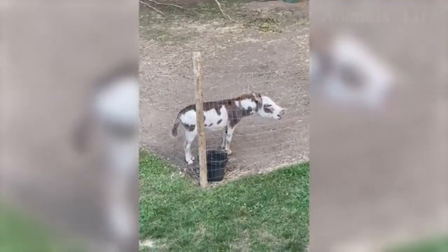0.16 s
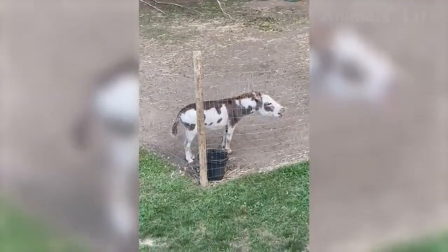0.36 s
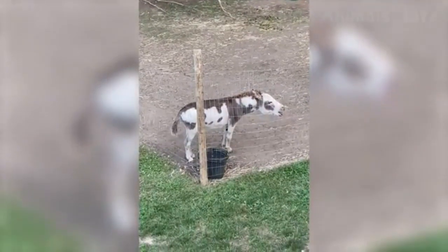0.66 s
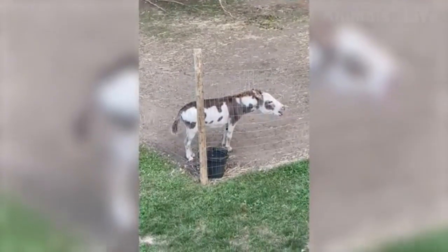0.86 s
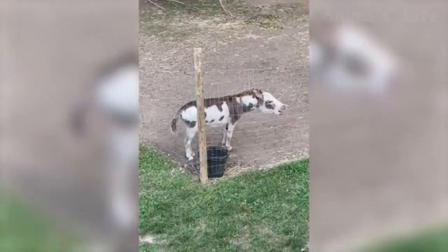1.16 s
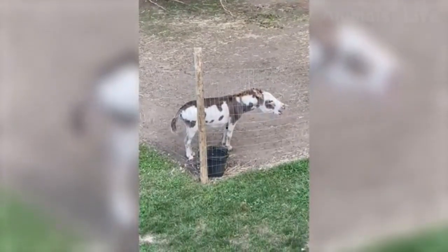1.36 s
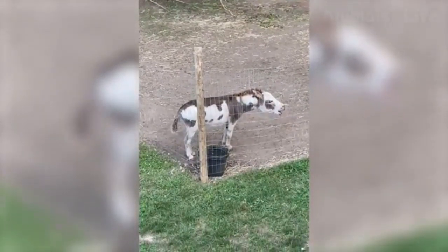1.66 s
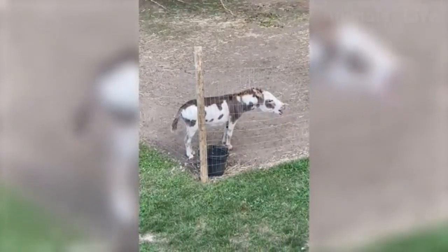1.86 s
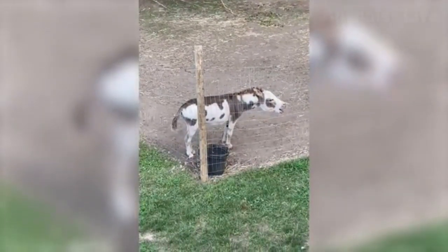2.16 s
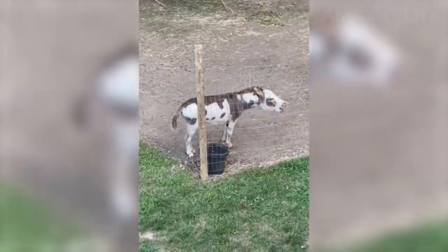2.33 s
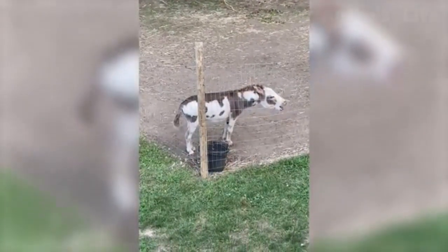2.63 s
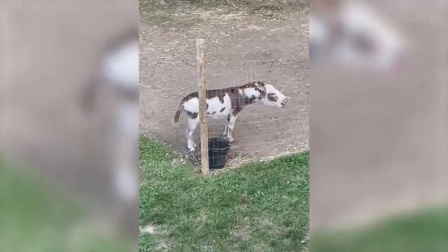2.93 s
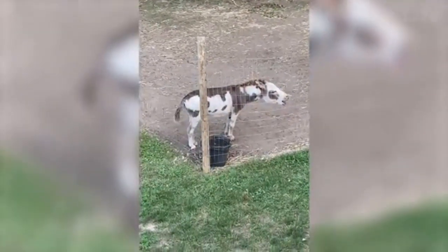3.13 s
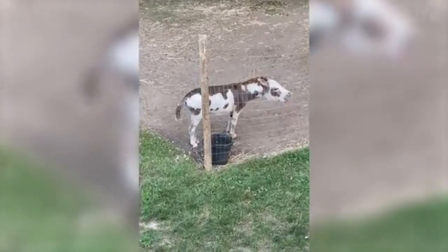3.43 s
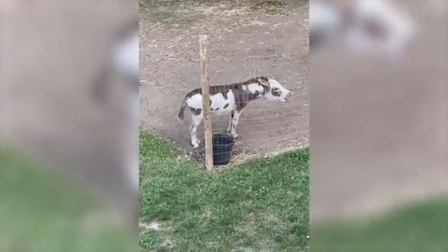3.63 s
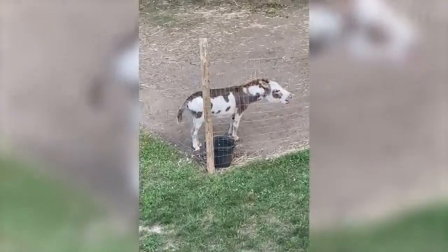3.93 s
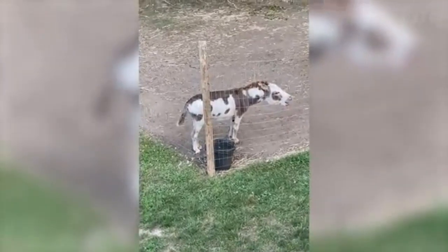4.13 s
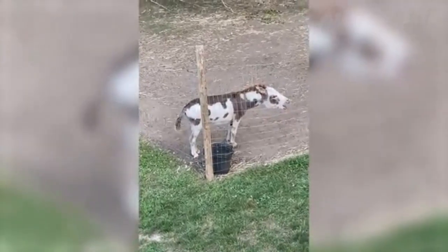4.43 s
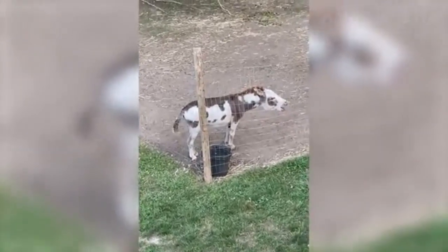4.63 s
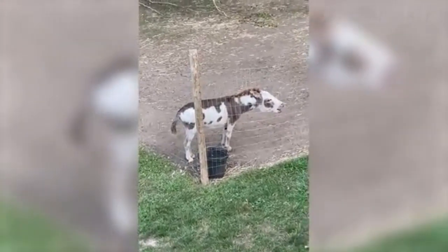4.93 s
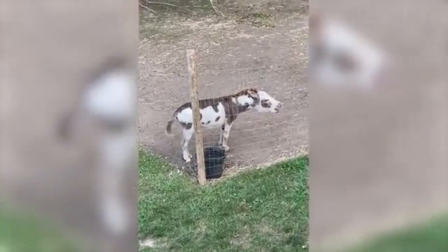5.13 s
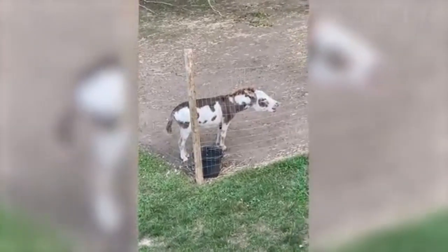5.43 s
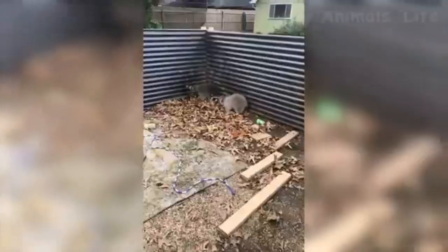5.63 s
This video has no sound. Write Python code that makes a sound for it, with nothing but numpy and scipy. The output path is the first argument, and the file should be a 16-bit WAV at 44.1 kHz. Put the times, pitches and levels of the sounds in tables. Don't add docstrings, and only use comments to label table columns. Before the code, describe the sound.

A donkey brays in a farmyard, some metres from the microphone. It starts immediately with a hoarse, strained out-breath, loudest near 0.3 s, which clears by 0.4 s into a held, slightly wavering note that weakens, flicks upward and dies roughly at 1.05 s. From 1.2 s the bray becomes a pumping run: very short, thin high whistles on the in-breath, often dropping in pitch, alternate with harsh quarter-second haws at about 1.5, 1.9, 2.5, 2.9, 3.5, 4.1, 4.7 and 5.3 s. The haws at 1.9 and 2.9 come without a whistle before them and sound less rough. Each haw swells from tone into buzzing rasp. A wall echoes about an eighth of a second later, with a light diffuse tail. Low wind, airy hiss and a faint far motor hum lie beneath. At 5.53 s everything cuts to brief silence, then from 5.57 s dry leaves rustle and crackle quietly.

```python
import sys
import numpy as np
from scipy import signal
from scipy.fft import rfft, irfft, next_fast_len
from scipy.io import wavfile
from scipy.ndimage import uniform_filter1d

SR = 44100
rng = np.random.default_rng(int(sys.argv[2]) if len(sys.argv) > 2 else 0)


def convert_level_to_amplitude(level_db):
    exponent = np.asarray(level_db, float) / 20
    return 10 ** exponent


def unload_wav(signal):
    wavfile.write(
        sys.argv[1],
        SR,
        np.round(np.clip(np.atleast_2d(signal).T, -1, 1) * 32767).astype(np.int16),
    )


N = 255162
TIME = np.arange(N) / SR
SILENCE_S = 5.531

# start t/s, length t/s, effort level/dB, half fold rate f/Hz, harshness level/dB
HAWS = [
    (1.466, 0.27, -20.5, 588.4, -3),
    (1.897, 0.2, -18, 597.9, -7),
    (2.505, 0.26, -20.5, 590.4, -3.5),
    (2.9, 0.24, -19.5, 596.2, -7),
    (3.522, 0.24, -19.5, 589.1, -2),
    (4.118, .25, -20.5, 585.6, -3),
    (4.703, .24, -20.5, 577.5, -4.5),
    (5.292, 0.24, -20, 577, -2),
]
# start t/s, upper note t/s, whole length t/s, upper level/dB, lower level/dB
HEES = [
    (1.163, 0.077, .19, -22, -26),
    (2.236, 0.082, 0.17, -20, -36),
    (3.252, .078, 0.18, -22, -26.5),
    (3.919, 0.089, 0.11, -24, -49),
    (4.516, .058, .11, -26, -29.5),
    (5.108, .052, 0.11, -25, -32),
]
# t/s, half fold rate f/Hz, effort level/dB,
# octave line over fold line level/dB, harshness level/dB
HOARSE_START = [
    (.02, 520.2, -29.5, -5, -5),
    (.045, 538.8, -24, 8, -1),
    (.19, 631.4, -25, -6.5, -3),
    (.24, 591.2, -18, -1, -8),
    (0.289, 588, -17, -7.5, -11),
    (.355, 575.7, -22.5, 6, -12),
]
HELD_NOTE = [
    (.39, 565.7, -25.5, -2.5, -24.5),
    (.57, 558.6, -28.5, 2.5, -36),
    (.7, 569.7, -30, 2, -28.5),
    (.83, 561.3, -31.5, -1.5, -46),
    (.87, 569.2, -26.5, 2, -36),
    (.954, 580.3, -31.5, 12.5, -15),
    (.99, 593.4, -23.5, -4, -34),
    (1.01, 574, -33, -1, -9.5),
    (1.065, 581.3, -34, -18, -28),
]
# fold line level/dB, octave over fold level/dB, half over fold level/dB
HAW_STAGES = [
    (-24.5, 0, -27),
    (-5.5, 0, -26),
    (-5, 0, -22),
    (-4, 1.5, 1),
    (0.5, -1.5, 2.5),
    (0, -1, -4.5),
    (-2, -14, -10.5),
    (-8, 9.5, 5.5),
    (1, -3.5, -10),
    (-14, -8.5, -26),
]
STAGE_RASP_DB = [-26, -15, -12, -9, -6, -2, 0, -6, -15, -22]
RATE_SCOOP = [1, .9, .8, .6, .4, .1]
# multiple of the half rate [1], level/dB under the octave line if even, the half line if odd
OVERTONES = [(3, -1.5), (5, -4.5), (6, -14), (7, -18.5), (8, -23), (9, -36), (10, -28.5), (11, -20)]
# multiple [1], level/dB
SECOND_LINES = [(1, -7), (2, 0), (3, -4), (4, -10), (5, -18)]
# f/Hz, width f/Hz, level/dB
THROAT_MODES = [(496.6, 110, -1.5), (641, 597, -19.5), (1225, 140, 2.5), (1281, 220, -2), (1590, 160, -1),
                (1719, 34, -19.5), (2082, 130, -2.5), (2352, 270, -9), (2564, 177, -4.5), (2878, 345, -8.5),
                (3170, 550, -15), (4037, 530, -22.5), (4720, 240, -32), (5240, 290, -30.5)]
# delay t/s, level/dB
NEAR_ECHOES = [(.024, -13.5), (0.028, -23), (.048, -28), (0.058, -24), (0.087, -19.5)]
# f/Hz, level/dB
YARD_COLOUR = [(400, -6), (1200, 1.5), (2400, -3), (4000, 5), (6000, 1)]
# delay t/s, level/dB
WALL_ECHOES = [(.118, -12), (.1235, 0), (.247, -26)]
# f/Hz, level/dB
WALL_COLOUR = [(400, -22), (600, -20), (1200, -18), (2400, -17), (4000, -15), (5400, -10), (6000, -7.5)]
# t/s, level/dB
LEAVES = [
    (5.572, -36),
    (5.58, -32.5),
    (5.6, -38.5),
    (5.72, -40),
    (5.765, -33),
    (5.786, -34),
]
# f/Hz, level/dB per Hz
LEAF_COLOUR = [(180, -10), (300, -13.5), (518, -12.5), (553, -20), (726, -8), (1140, -9), (2000, -8),
               (6700, -12), (8710, -38), (14700, -120)]
# f/Hz, level/dB per Hz
BACKGROUND_COLOUR = [(53, -34), (90, -8), (337, -11.5), (565, -10), (949, -16), (1150, -8), (1870, -10.5),
                     (2270, -5), (3680, -24.5), (3950, -12), (4900, -31.5), (5550, -8), (6400, -23), (8320, -39),
                     (14100, -120)]
# t/s, level/dB
GUSTS = [(0, -37), (.48, -54), (1.1, -68), (1.6, -57), (1.99, -47.5), (2.301, -57), (2.62, -58),
         (3.06, -60), (3.7, -60.5), (4.45, -55), (5.3, -61)]
# f/Hz, level/dB
MOTOR_LINES = [(106, -59), (212, -63.5)]
# f/Hz, level/dB
TREBLE_COLOUR = [(6400, -52), (6500, -25), (7700, -26.5), (8400, -29.5), (8900, -35.5), (9500, -23.5),
                 (10100, -11.5), (11000, -14), (11900, -26.5), (12100, -46)]
# delay t/s, level/dB
WIDTH_TAPS = [(.0099, -2.5), (0.014, -13), (0.021, -2.5), (0.024, -31), (0.03, 10)]
# f/Hz, level/dB
WIDTH_COLOUR = [(60, -40), (250, -37), (500, -25), (900, -26), (1100, -13), (1300, -14), (1500, -28),
                (3500, -31), (5000, -30), (6400, -29), (6700, -9), (8500, -8), (11000, -24)]
# f/Hz, level/dB against the whole moment
WEAK_BANDS = [(1500, -75), (3000, -49), (4000, -49), (6000, -65.5), (9000, -65), (13000, -58.5)]


def haws():
    gate, (half_hz, fold_db, octave_db, half_db, rasp_db) = breaths(out_breaths(), fade_s=0.0038)
    chaos = np.clip(convert_level_to_amplitude(rasp_db - fold_db + 3), 0, 1)
    jitter = 0.00078 * drift(20) + 0.0304 * chaos ** 2 * drift(62.4)
    phase = turning(half_hz * (1 + jitter))
    lines = convert_level_to_amplitude(fold_db) * np.sin(2 * phase)
    lines += convert_level_to_amplitude(octave_db) * np.sin(4 * phase + 1)
    lines += convert_level_to_amplitude(half_db) * np.sin(phase)
    for k, db in OVERTONES:
        parent_db = half_db if round(k) % 2 else octave_db
        lines += convert_level_to_amplitude(parent_db + db - k * chaos + 2.2 * drift(6.3)) * np.sin(round(k) * phase + k * k)
    thirds = sum(convert_level_to_amplitude(3 * drift(20)) * np.sin(k * phase * 2 / 3 + k) for k in (2, 4, 5, 7, 8, 10))
    three_beat = convert_level_to_amplitude(-46) * swell(0.88, 1, 0.024) * thirds
    voiced = np.sqrt(2) * (convert_level_to_amplitude(-5 * chaos) * lines + three_beat)
    beats = np.diff(np.floor(phase / np.pi + 0.12 * drift(300)), prepend=0) > 0
    shares = (1 / 2, 2 / 3, 1 / 3, 1 / 5)
    patterns = sum(convert_level_to_amplitude(5 * drift(14)) * np.cos(phase * share + 1.2 * drift(25)) for share in shares)
    slaps = beats * (1.5 * rng.uniform(-1, 1, N) + 0.45 * patterns)
    rasp = convert_level_to_amplitude(rasp_db + 7.5) * throat(slaps + 0.058 * noise())
    return gate * (voiced + rasp)


def out_breaths():
    half_line_db = -4
    calls = [[(s, hz, db, db + bright, db + harsh + half_line_db, db + harsh)
              for s, hz, db, bright, harsh in HOARSE_START + HELD_NOTE]]
    catch_s, release_s, repeat_dip_hz = 0.011, 0.04, 21.99
    harsh_lift_hz = 18
    fold, bright, half = np.transpose(HAW_STAGES)
    for start, length, db, hz, harsh in HAWS:
        full, slack_hz, since, until, uneven = habit(start)
        stages_s = [0, catch_s, uneven - 0.007, uneven, full, since * length, (since + until) / 2 * length,
                    until * length, length - release_s, length]
        s = start + np.maximum.accumulate(stages_s)
        rate = hz + np.r_[-slack_hz * np.array(RATE_SCOOP), harsh_lift_hz, -harsh_lift_hz / 2, 0, 0]
        if slack_hz < 0:
            rate[1:6] = hz - repeat_dip_hz * np.array([1, 0.4, 0.2, 0, 0])
        rasp = db + harsh + np.array(STAGE_RASP_DB)
        calls.append(np.transpose([s, rate, db + fold, db + fold + bright, db + fold + half, rasp]))
    return calls


def habit(start_s):
    if any(0 < start_s - hee[0] < 0.4 for hee in HEES):
        return 0.04, 40, 0.3, 0.7, 0.02
    return 0.055, -25, 0.45, 0.75, 0.042


def second_beat():
    spells = [(0.013, 0.22, -20)]
    for start, length, db, _, _ in HAWS:
        _, _, since, until, _ = habit(start)
        spells.append((start + since * length - 0.02, start + until * length, db - 8))
    gain = sum(convert_level_to_amplitude(db) * swell(a, b, 0.028) for a, b, db in spells) * convert_level_to_amplitude(3.3 * drift(18))
    octave_hz = 1281
    phase = turning(octave_hz * (1 + 0.025 * drift(9) + 0.0109 * drift(52))) / 2
    return gain * sum(convert_level_to_amplitude(db + 2.74 * drift(26)) * np.sin(round(k) * phase + k * k) for k, db in SECOND_LINES)


def throat(x):
    modes = 0
    for k, (hz, width_hz, db) in enumerate(THROAT_MODES):
        modes = modes + (-1) ** k * convert_level_to_amplitude(db) * twice_resonant(x, hz, width_hz)
    return rms_one(colour(modes, [(300, -10.5), (390, 0.5), (760, 1), (950, 0), (1090, 0.5)]))


def hees():
    gate, (hz, whistle_db, hiss_db, air_db) = in_breaths()
    phase = turning(hz * (1 + 0.00389 * drift(121)))
    whistle = np.sqrt(2) * convert_level_to_amplitude(np.minimum(whistle_db, -17) + 1.5 * drift(70)) * np.sin(phase)
    hiss = convert_level_to_amplitude(np.minimum(hiss_db, -33)) * rms_one(twice_resonant(noise(), 5750, 900))
    hiss_from_hz = 5130
    hiss = colour(hiss, [(hiss_from_hz * 0.91, -22), (hiss_from_hz, 0), (6450, 0.5), (6700, -15)])
    edge = colour(resonance(noise(), 1950, 1500), [(4200, 0.5), (4700, -18)])
    edge = convert_level_to_amplitude(air_db - 1.5) * rms_one(edge)
    return gate * (whistle + hiss + edge + convert_level_to_amplitude(air_db + 2) * throat(noise()))


def in_breaths():
    upper_hz, lower_hz, chirp_hz, sag_hz = 6076, 5377, 250.3, 270
    chirp_s, drop_s, bite_s, let_go_s = 0.007, 0.018, 0.02, 0.021
    fade_db_per_s, break_db_per_s = -150, -89
    gasp_db = 7
    gate = np.zeros(N)
    hz, whistle_db, air_db = np.full(N, float(lower_hz)), np.full(N, -90.0), np.full(N, -46.5)
    for start, upper, length, upper_db, lower_db in HEES:
        on = (TIME > start) & (TIME < start + length)
        age = TIME[on] - start
        held = upper_hz + chirp_hz * np.exp(-age / chirp_s) - sag_hz * np.minimum(age / upper, 1) ** 2
        hz[on] = lower_hz + (held - lower_hz) * np.exp(-np.maximum(age - upper, 0) / drop_s)
        faded = upper_db + fade_db_per_s * upper
        broken = faded + break_db_per_s * upper
        rest = length - upper
        points_s = [0, bite_s, upper / 2, upper, upper + 0.2 * rest, upper + 0.44 * rest,
                    length - let_go_s, length]
        points_db = [upper_db - 17, upper_db, upper_db - 1.5, faded, broken, lower_db,
                     lower_db + 2, lower_db - 16]
        whistle_db[on] = np.interp(age, points_s, points_db)
        air_db[on] += gasp_db * np.exp(-age / bite_s)
        gate += swell(start, start + length, 0.0076)
    return gate, (hz, whistle_db, -37.5 + 3 * drift(12), air_db)


def yard(x):
    t60_s, tail_db = 0.62, -13
    t = np.arange(SR * 3 // 4) / SR
    tail = rng.standard_normal(len(t)) * convert_level_to_amplitude(-60 * t / t60_s) * np.clip(t / 0.01, 0, 1)
    tail /= np.sqrt(np.sum(tail ** 2))
    scattered = delayed(x, NEAR_ECHOES) + convert_level_to_amplitude(tail_db) * signal.fftconvolve(x, tail)[:N]
    return colour(scattered, YARD_COLOUR) + colour(delayed(x, WALL_ECHOES), WALL_COLOUR)


def leaves():
    start_s = LEAVES[0][0]
    high_db, = in_time(LEAVES)
    rumble = rms_one(colour(noise(), [(20, -10), (40, 4), (120, -1.5), (300, -13), (500, -34)]))
    crackle = rms_one(colour(noise() * convert_level_to_amplitude(1.33 * drift(130)), LEAF_COLOUR))
    rustle = convert_level_to_amplitude(-46) * swell(start_s, 9, 0.023) * rumble + convert_level_to_amplitude(high_db) * crackle
    return np.clip((TIME - start_s) / 0.0035, 0, 1) * cut_above(rustle, 6610)


def background():
    hum = 0
    for hz, db in MOTOR_LINES:
        cycles = hz * TIME + 0.28 * drift(1.97)
        hum = hum + convert_level_to_amplitude(db + 2 * drift(2.1)) * np.sin(2 * np.pi * cycles)
    rumble = colour(noise(), [(20, -20), (35, -21), (55, -2.5), (75, -3.5), (100, -25), (150, -29)])
    calm_db, gust_s = -54.5, 0.096
    wind = convert_level_to_amplitude(calm_db) + sum(convert_level_to_amplitude(db) * np.exp(-((TIME - s) / gust_s) ** 2) for s, db in GUSTS)
    air = convert_level_to_amplitude(-46.5 + 3.6 * drift(4.2)) * rms_one(colour(noise(), BACKGROUND_COLOUR))
    return air + wind * convert_level_to_amplitude(0.5) * rms_one(rumble) + np.sqrt(2) * hum


def noise():
    return rng.standard_normal(N)


def drift(rate_hz):
    r = np.exp(-2 * np.pi * rate_hz / SR)
    return rms_one(signal.lfilter([1], [1, -2 * r, r * r], rng.standard_normal(N + SR))[SR:])


def turning(hz):
    return 2 * np.pi * np.cumsum(hz) / SR


def rms_one(x):
    return x / np.sqrt(np.mean(x ** 2) + 1e-20)


def in_time(rows):
    s, *columns = np.transpose(rows)
    return [np.interp(TIME, s, c) for c in columns]


def breaths(calls, fade_s):
    gate = sum(swell(c[0][0], c[-1][0], fade_s) for c in calls)
    return gate, in_time([row for c in calls for row in c])


def swell(start_s, end_s, fade_s):
    return np.clip(np.minimum(TIME - start_s, end_s - TIME) / fade_s, 0, 1)


def colour(x, points):
    size = next_fast_len(N + SR // 4)
    hz, db = np.transpose(points)
    bins_hz = np.arange(size // 2 + 1) * SR / size
    gain = convert_level_to_amplitude(np.interp(np.log(bins_hz + 1), np.log(hz), db))
    return irfft(rfft(x, size) * gain, size)[:N]


def cut_above(x, hz):
    return colour(x, [(hz, 0), (hz * 1.02, -90)])


def resonance(x, hz, width_hz):
    r = np.exp(-np.pi * width_hz / SR)
    poles = [1, -2 * r * np.cos(2 * np.pi * hz / SR), r * r]
    return signal.lfilter(np.array([1, 0, -1]) * (1 - r * r) / 2, poles, x)


def twice_resonant(x, hz, width_hz):
    return resonance(resonance(x, hz, width_hz), hz, width_hz)


def delayed(x, taps):
    return sum(convert_level_to_amplitude(db) * np.r_[np.zeros(round(s * SR)), x][:N] for s, db in taps)


def scene():
    voice = haws() + second_beat() + hees()
    before = np.clip((SILENCE_S - TIME) * 500, 0, 1)
    return np.tile(before * (voice + yard(voice) + background()) + leaves(), (2, 1))


def rebuilt_treble(low):
    shift_hz = SR / 8
    lifted = (signal.hilbert(low, next_fast_len(N))[:N] * np.exp(2j * np.pi * shift_hz * TIME)).real
    treble = colour(lifted * (1 + 0.28 * drift(600)), TREBLE_COLOUR) * convert_level_to_amplitude(2.56 * drift(5.9))
    level = np.sqrt(uniform_filter1d(treble ** 2, size=800))
    fizz = level * twice_resonant(noise(), 11870, 1800)
    tone = convert_level_to_amplitude(-51.5) * swell(0.381, 0.71, 0.05) * np.sin(2 * np.pi * 13007 * TIME)
    return treble + convert_level_to_amplitude(0.5) * cut_above(fizz, 13000) + tone


def drop_weak_bands(x):
    hz, _, spec = signal.stft(x, SR, "cosine", 2048)
    power = np.abs(spec[:1024]) ** 2
    bands = uniform_filter1d(power.reshape(128, 8, -1).mean(axis=1), size=3, axis=1)
    band_hz = hz[4:1024:8]
    under_db = np.interp(band_hz, *np.transpose(WEAK_BANDS))[:, None]
    floor_db = -103
    limit = convert_level_to_amplitude(2 * under_db) * power.sum(axis=0) + convert_level_to_amplitude(2 * floor_db) * (band_hz[:, None] > 1500)
    keep = 1 / (1 + (limit / (bands + 1e-20)) ** 6)
    spec[:1024] *= np.repeat(keep, 8, axis=0)
    return signal.istft(spec, SR, "cosine", 2048)[1][:N]


def roll_off(x):
    return signal.sosfilt(signal.butter(12, 14330, fs=SR, output="sos"), x)


def record(dry):
    before = TIME < SILENCE_S
    low = colour(dry[0] * before, [(6400, -0.5), (6500, -2), (7300, 7.5), (8000, -37)])
    farm = drop_weak_bands(low + rebuilt_treble(low)) * before
    mid = farm + dry[0] * ~before
    side = convert_level_to_amplitude(-3.5) * colour(delayed(farm, WIDTH_TAPS), WIDTH_COLOUR) * before
    return roll_off(np.array([mid + side, mid - side]))


dry = scene()
out = record(dry)
unload_wav(out)
```